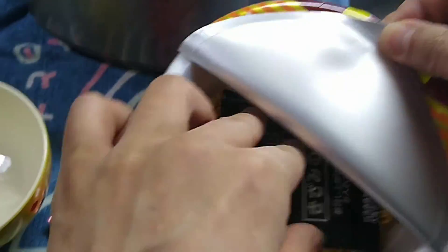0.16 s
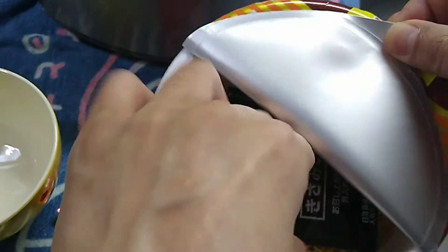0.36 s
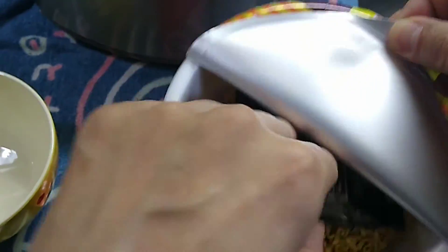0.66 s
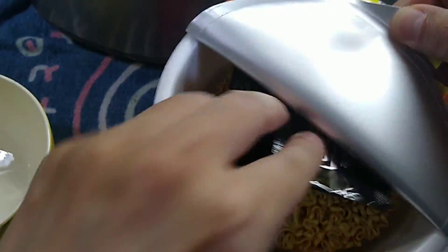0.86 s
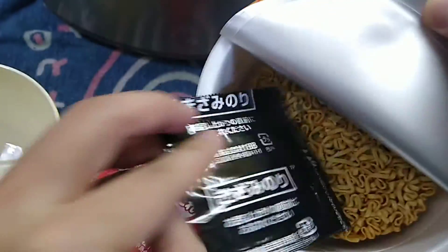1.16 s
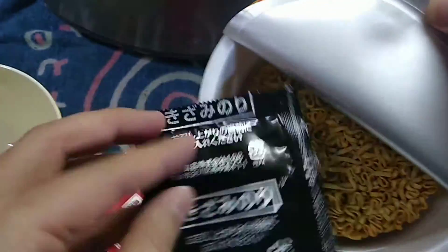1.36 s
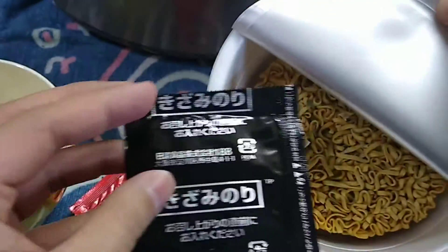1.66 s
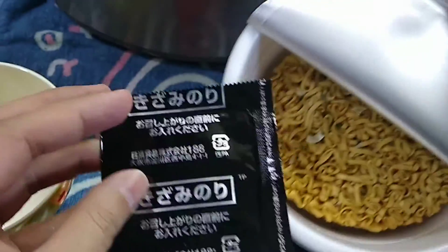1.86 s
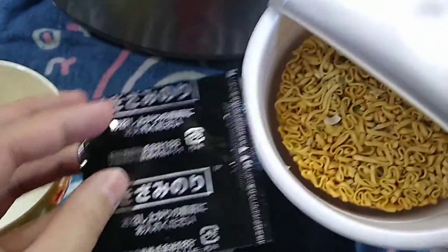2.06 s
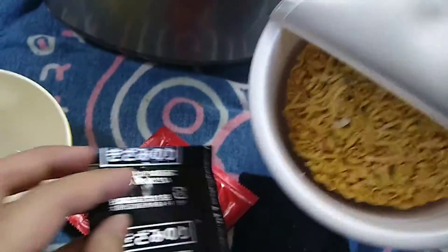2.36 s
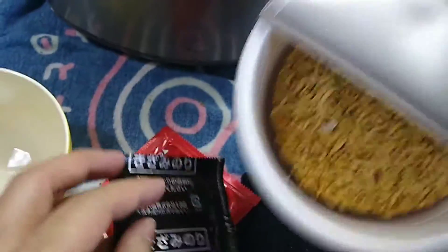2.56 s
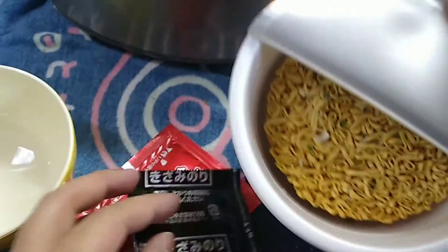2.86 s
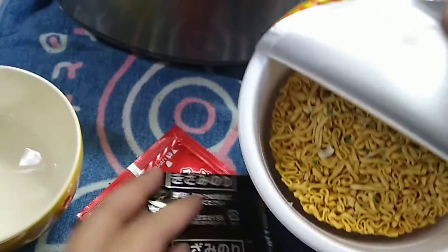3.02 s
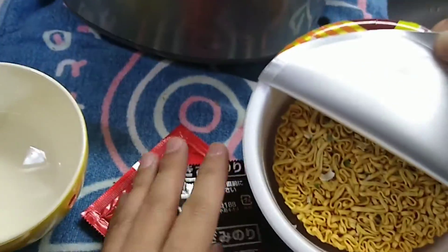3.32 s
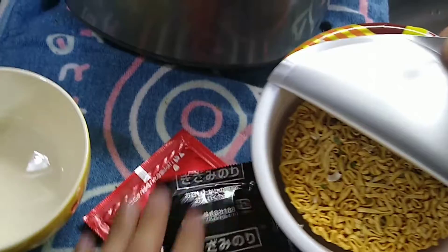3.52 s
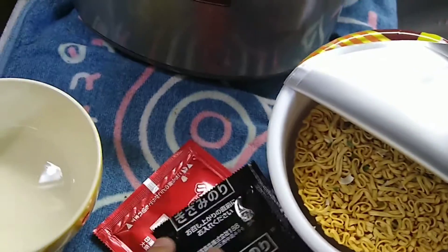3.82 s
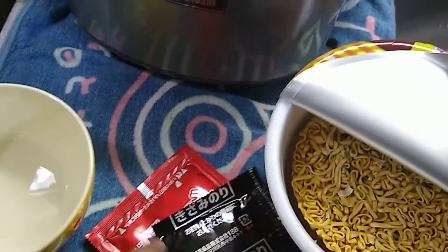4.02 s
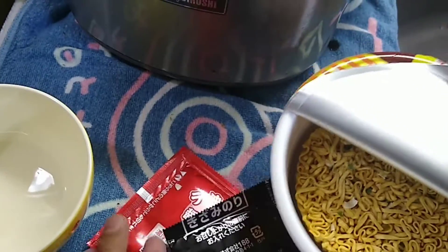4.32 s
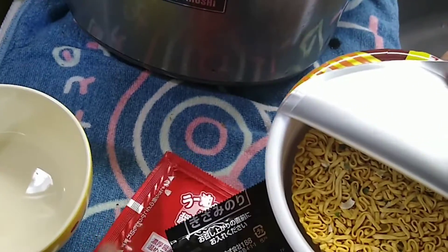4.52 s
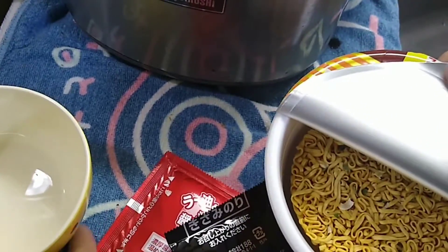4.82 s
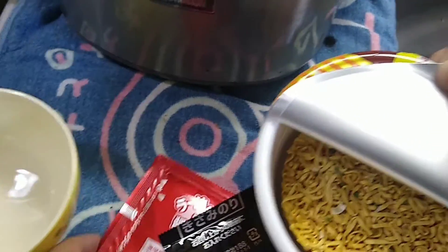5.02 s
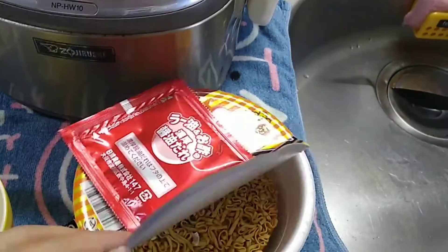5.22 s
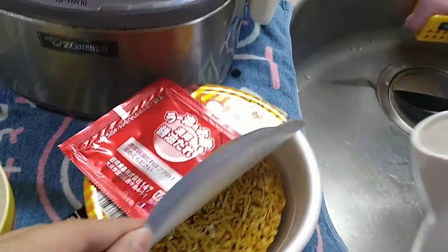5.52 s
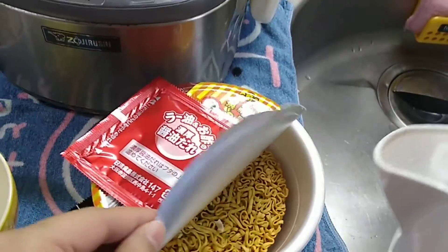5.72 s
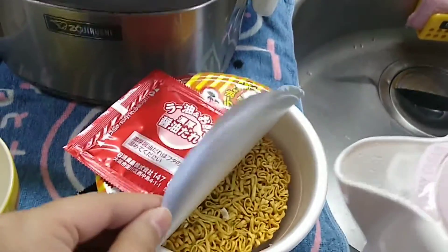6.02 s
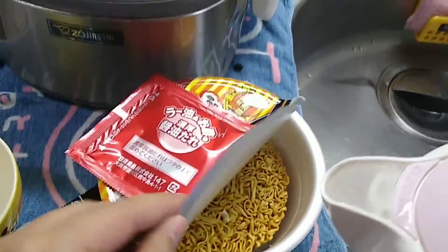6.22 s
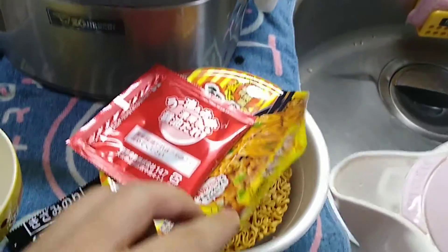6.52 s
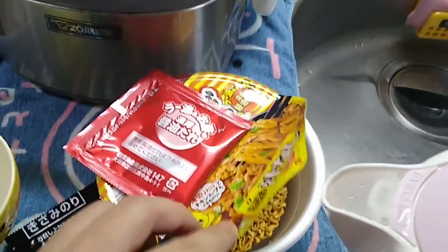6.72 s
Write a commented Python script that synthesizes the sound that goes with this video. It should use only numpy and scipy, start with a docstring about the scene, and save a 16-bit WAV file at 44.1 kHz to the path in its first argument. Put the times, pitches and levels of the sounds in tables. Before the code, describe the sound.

A foil sachet is handled very close to the microphone in a quiet kitchen. Light rustling starts at once and builds into dense, bright crinkling with sharp snaps, loudest from about 0.6 to 1.5 seconds as it leaves a foam noodle bowl. Soft hollow knocks on the bowl sound underneath, the clearest near 0.9 seconds. Around 1.8 to 2.2 seconds the film slides more quietly with a thin, faint scrape, followed by duller crackles and bumps until 2.8. After a brief lull with faint fingertip taps, separate crisp bursts come at about 3.4, 3.7, 4.0 and 4.3 seconds, with another hollow knock at 4.0. Softer rustling follows, turning into smooth, swishing strokes on the lid from about 5.4 to 6.3 seconds, with a light bump at 5.6. A last small crackle and taps come near 6.4, fading into faint room noise and low rumble.

```python
"""Foil sachet and noodle bowl

A quiet kitchen, a phone's two microphones close by. A hand lifts a foil sachet out of a foam noodle
bowl, lays it on a cloth and handles the lid. The film rustles in dense tiny cracks and snaps where a
crease buckles; bowl and sachet ring under it. Fingers knock, tap and scrape; the room rumbles behind."""
import sys
import numpy as np
from scipy import signal
from scipy.fft import rfft, irfft, next_fast_len
from scipy.io import wavfile
from scipy.ndimage import uniform_filter1d

SR = 44100
rng = np.random.default_rng(int(sys.argv[2]) if len(sys.argv) > 2 else 0)


def materialize(psi):
    """Save the field psi as 16-bit PCM at rate SR to the path in sys.argv[1].

    A 1-D psi becomes a single channel; in a 2-D psi each row is a channel.
    """
    bounded = np.clip(np.atleast_2d(psi).T, -1, 1)
    quanta = np.round(bounded * 32767).astype(np.int16)
    wavfile.write(sys.argv[1], SR, quanta)


N = 303408
T = np.arange(N) / SR
FFT_SIZE = next_fast_len(N + 4096)
HZ = np.maximum(np.fft.rfftfreq(FFT_SIZE, 1 / SR), 1)

# How much of the rustle is separate cracks, not smooth sliding: (time [s], share [0-1])
CRACK_SHARE = [(0, .35), (.5, .55), (1.6, .55), (1.85, .1), (2.15, .15), (2.3, .6), (4.35, .5), (4.5, .25),
               (5.3, .25), (5.45, .07), (6.28, .07), (6.33, .3)]
# The film's bright and dull voices at close range: (frequency [Hz], relative level [dB])
BRIGHT_FILM = [(2500, -43.5), (4800, -7), (6400, -3), (8000, -5), (10200, -2), (12500, -6), (14500, -9),
               (16000, -13)]
DULL_FILM = [(900, -43), (1900, -11), (2250, -4.5), (2800, 3), (3400, 3.5), (4200, 1.5), (5000, -9),
             (8000, -46)]
# Resonances of the foam bowl: (frequency [Hz], width [Hz], relative level [dB])
BOWL_MODES = [(710.4, 28, 8), (809, 120, 5), (937, 230, 8.5), (1384, 90, 2), (1560, 1500, 6.5),
              (565.3, 110, -13)]
# Creases buckling close to the microphones: (time [s], bright film level [dB],
# dull film offset [dB], bowl offset [dB], bright film t60 [s], crack pitch [Hz])
CREASE_SNAPS = [(0.131, -42.5, -1.5, -10, 0.043, 10100), (0.241, -44.5, -3, -6, 0.017, 7000),
                (0.2668, -32, -8, -3, 0.021, 6330), (0.3668, -40, -6, -10, 0.011, 9100),
                (0.394, -36, -25, -30, 0.013, 9600), (0.444, -33, -5.5, -22, 0.012, 8000),
                (0.515, -28, -10, -11.5, 0.021, 7470), (0.5671, -29.5, -21, -9, 0.041, 10650),
                (0.592, -16.5, -14, -17.5, 0.021, 10460), (0.619, -17.5, -18, -30, 0.0092, 10500),
                (0.6433, -32, 0, -25, 0.024, 7090), (0.663, -21, -9.5, -6.5, 0.025, 6630),
                (0.697, -22.5, -4, -9, 0.023, 10600), (0.729, -14, -26.5, -26, 0.0089, 12070),
                (0.852, -22.5, -19, -9, 0.011, 8600), (0.916, -22, -35, -19, 0.015, 12800),
                (0.9526, -19.5, -18, -17, 0.015, 11450), (1.034, -27, -23, -31, 0.024, 11400),
                (1.049, -20, -10, -23, 0.0094, 8000), (1.0615, -22.5, -7, -11.5, 0.022, 8950),
                (1.0968, -17, -28, -25, 0.034, 6630), (1.1309, -6, -21, -25.5, 0.015, 9370),
                (1.1496, -19.5, -24, -25, 0.019, 9900), (1.201, -28, -31, -13.5, 0.018, 10300),
                (1.2297, -28, -32, -22, 0.019, 7900), (1.277, -22.5, -33.5, -39, 0.02, 10900),
                (1.2977, -22, -32, -16.5, 0.026, 7970), (1.477, -21.5, -11, -13, 0.018, 6560),
                (1.515, -27, 0, -3.5, 0.0072, 4070), (1.531, -15, -6, -11.5, 0.024, 4610),
                (1.724, -43, -6.5, -8.5, 0.035, 8050), (2.227, -30, -2, -9.5, 0.072, 4650),
                (2.2415, -25, -11, -20, 0.036, 5940), (2.268, -28.5, -8, -18.5, 0.022, 5800),
                (2.4438, -42, -5, -4.5, 0.018, 5860), (2.4942, -31, -8, -25, 0.017, 8950),
                (2.561, -51.5, 1.5, 3, 0.02, 4460), (2.6036, -43, -3, -3.5, 0.022, 8500),
                (2.6454, -41, -19, -4, 0.02, 5900), (2.81, -38, -3, -1, 0.011, 5000),
                (2.823, -26, -6, -12, 0.022, 2620), (3.3579, -45, -3, -9.5, 0.027, 8140),
                (3.376, -39.5, -13, -46, 0.11, 10900), (3.3974, -17.5, -14, -20.5, 0.019, 8160),
                (3.4536, -24, -10, -16, 0.028, 9630), (3.687, -41.5, -7, -30, 0.039, 7600),
                (3.717, -26.5, -23, -18.5, 0.067, 8000), (3.907, -46.5, 1, -12, 0.017, 5060),
                (3.9413, -35.5, -33, -42, 0.0124, 5700), (4.0055, -23, -14.5, -18, 0.047, 10800),
                (4.1067, -41.5, -9, -14.5, 0.023, 9870), (4.118, -43.5, -13, -24, 0.024, 10500),
                (4.2678, -31.5, -27, -47, 0.054, 10170), (4.325, -24.5, -12, -18, 0.033, 5520),
                (4.705, -59.5, 13, 1, 0.022, 4500), (4.796, -39, -11, -39, 0.033, 5500),
                (4.939, -45.5, 5, -21.5, 0.018, 7750), (5.0492, -49, 4, -13, 0.016, 6675),
                (5.251, -34.5, -17, -13.5, 0.068, 8400), (5.626, -42.5, 5, 2, 0.025, 6000),
                (6.397, -35.5, -8, -17.5, 0.046, 6000)]


def sachet():
    """Foreground: rustle and snaps shake the bright film, dull film and bowl, each in its own measure."""
    share = np.interp(T, *np.transpose(CRACK_SHARE))
    bright, dull, bowl = hand_strokes(share) * undb(2 * 1.2 * flutter(45))
    dull, bowl = (rub * undb(2 * 2.0 * flutter(30)) for rub in (dull, bowl))
    when, snap_db, dull_db, bowl_db, t60, crack_hz = np.transpose(CREASE_SNAPS)
    rise_s = 0.12 * t60  # long crunches build more slowly
    common_cracks = tiny_cracks()
    # a snap opens on a pitched crack: harder when sudden or high, a ring when low, broad when high
    crack_db = snap_db + 7.5 - 900 * rise_s + 20 * np.log10(crack_hz / 6600)
    crack = rings(when + rise_s / 2, crack_db, t60 / 2, crack_hz,
                  rise_s=.0002, spread=2e-9 * crack_hz ** 2)
    out = microphones(0, 0.97, tone=crack)
    bodies = [(shifting_folds, colour(BRIGHT_FILM), bright, 0, 1.0),
              (shifting_folds, colour(DULL_FILM), dull, dull_db, 1.2),
              (microphones, modes(BOWL_MODES), bowl, bowl_db, 1.6)]
    for radiate, response, rub, offset_db, t60_factor in bodies:
        # most cracks are heard in every body, some in one only
        grain = 1 - share + share * (3 * common_cracks + tiny_cracks()) / 4
        snaps = blows(when, snap_db + offset_db, t60_factor * t60, rise_s)
        out = out + radiate(rub * grain + buckling(snaps), response)
    return out


def buckling(snaps):
    """Power around each snap: the film creaks under strain, gives, then sheet, table and walls answer."""
    creak_s = 0.0025
    strain = signal.lfilter([1], [1, -np.exp(-1 / (creak_s * SR))], snaps[::-1])[::-1]
    creak = undb(2 * -18.5) * strain * 300 / SR
    tail = undb(2 * -9.5) * fade(snaps, t60_s=0.042) * 600 / SR
    return creak + snaps + tail


# Single movements of the hand on the film, close up: (time of full strength [s], hold [s], swell [s],
# bright film level [dB], dull film offset [dB], bowl offset [dB])
HAND_STROKES = [(0.004, 0.01, 0.073, -53, -9, -14.5), (0.13, 0.0074, 0.17, -55, -3.5, -9),
                (0.265, 0.065, 0.41, -49.5, -6, -7.5), (0.365, 0.02, 0.011, -45.5, -8, -9.5),
                (0.455, 0.016, 0.084, -50, -11, -3), (0.523, .005, 0.034, -45.5, -7.5, -11.5),
                (0.608, .005, 0.016, -35, -4.5, -6.5), (0.66, 0.13, 0.037, -42, -7.5, -6.5),
                (0.826, 0.049, 0.096, -35, -9.5, -12), (0.899, 0.083, 0.12, -39.5, -7.5, -5),
                (1.06, 0.081, 0.088, -28.5, -15.5, -12), (1.2, 0.051, 0.28, -41, -21, -15.5),
                (1.296, 0.013, 0.12, -35, -12, -14.5), (1.35, 0.066, 0.15, -52, -4, -14.5),
                (1.528, 0.018, 0.097, -38.5, -7, -7.5), (1.64, 0.11, 0.16, -60.5, -5, -15.5),
                (1.904, 0.12, 0.29, -54, -5, -39), (2.06, 0.093, 0.15, -52, -5.5, -24),
                (2.244, 0.0055, 0.16, -43.5, -3.5, -9.5), (2.495, 0.037, 0.11, -49, -1.5, -6),
                (2.621, 0.064, 0.037, -50, -3, -5), (2.779, 0.049, 0.099, -48, -3, -0.5),
                (3.052, 0.0084, 0.027, -63, -14, -11), (3.178, 0.077, 0.064, -60, -15, -51),
                (3.279, 0.021, 0.026, -68, -9, -29.5), (3.395, 0.021, 0.0095, -39, -6.5, -27),
                (3.462, 0.0038, 0.092, -40.5, -7, -16.5), (3.72, 0.011, 0.065, -35, -10.5, -18.5),
                (3.935, 0.011, 0.19, -47.5, -5, -28), (4.02, 0.0025, 0.011, -38.5, -8, -15),
                (4.272, 0.023, 0.049, -39, -7, -15.5), (4.349, 0.023, 0.11, -50.5, -10, -10),
                (4.453, 0.051, 0.43, -46.5, -7.5, -23.5), (4.598, 0.064, 0.19, -51, -7.5, -23),
                (4.7, 0.16, 0.28, -56, -11, -25.5), (5.056, 0.055, 0.0088, -54, -6.5, -17.5),
                (5.14, 0.066, 0.16, -46, -8, -43), (5.24, 0.048, 0.12, -55, -4.5, -12),
                (5.319, 0.031, 0.029, -59, 0.5, -1.5), (5.389, 0.02, 0.048, -47.5, -10, -28),
                (5.47, 0.086, 0.2, -42.5, -11.5, -45), (5.618, 0.029, 0.11, -43.5, -3, -12),
                (5.708, 0.08, 0.51, -43, -11, -29), (5.855, 0.032, 0.18, -46.5, -8, -54),
                (5.979, 0.027, 0.1, -53, -9.5, -38.5), (6.159, 0.047, 0.12, -54.5, -10, -40.5),
                (6.343, 0.016, 0.061, -55, -1.5, -9), (6.429, 0.066, 0.012, -61.5, -4, -10),
                (6.5, 0.024, 0.09, -67.5, -2, -5)]


def hand_strokes(crack_share):
    """Power on bright film, dull film and bowl: a stroke swells, holds, lets go; the film settles."""
    slide_stop_db_s, crumple_stop_db_s, settle_db_s = 894.5, 399, 121.5
    sliding_below, swell_curve = .2, 2.45
    contact_db, contact_ends_s, contact_fade_db_s = -74, 6.26, 56.5
    power = np.zeros((3, N))
    power[0] = undb(2 * (contact_db - contact_fade_db_s * np.maximum(T - contact_ends_s, 0)))
    for when, hold_s, swell_s, db, dull_db, bowl_db in HAND_STROKES:
        span = slice(max(int((when - swell_s) * SR), 0), int((when + hold_s + .5) * SR))
        early_s = np.maximum(when - T[span], 0)
        late_s = np.maximum(T[span] - when - hold_s, 0)
        swell = np.clip(1 - early_s / swell_s, 0, 1) ** (2 * swell_curve)
        stop_db_s = np.where(crack_share[span] < sliding_below, slide_stop_db_s, crumple_stop_db_s)
        release = undb(-2 * stop_db_s * late_s)
        settling = crack_share[span] * undb(2 * (-11.5 - settle_db_s * late_s))
        body_db = db + np.array([[0], [dull_db], [bowl_db]])
        power[:, span] += undb(2 * body_db) * swell * (release + settling)
    return power


def tiny_cracks(per_s=300, spread_db=4.5, loudest_db=11):
    """Power of many small cracks in the film, very uneven in size, mean 1."""
    hits = rng.random(N) < per_s / SR
    size_db = np.minimum(spread_db * rng.exponential(size=N), loudest_db)
    power = fade(hits * undb(2 * size_db), t60_s=.008)
    return power / power.mean()


def shifting_folds(power, response, shapes=9, shifts_per_s=14, shift_db=8, ripple_db=4.5, width_hz=220):
    """The crumpled sheet keeps changing shape: its sound drifts among sets of random resonances."""
    weights = undb(2 * shift_db * np.array([flutter(shifts_per_s) for _ in range(shapes)]))
    width_bins = int(width_hz * FFT_SIZE / SR)
    out = 0
    for weight in weights / weights.sum(axis=0):
        ripple = smooth(rng.standard_normal(len(HZ)), width_bins)
        resonances = unit_rms(undb(ripple_db * ripple / ripple.std()))
        out = out + microphones(power * weight, response * resonances)
    return out


# Resonances of the table under the bowl: (frequency [Hz], width [Hz], relative level [dB])
TABLE_MODES = [(201.8, 230, -1), (445, 750, -7)]
# Fingers and sachet bumping the bowl, close up: (time [s], level [dB], pitch [Hz], t60 [s])
BOWL_KNOCKS = [(0.09, -40, 268, 0.13), (0.36, -47.5, 300, 0.11), (0.696, -39.5, 313, 0.19),
               (0.847, -40.5, 240, 0.15), (0.923, -30.5, 320, 0.091), (1.106, -44, 322, 0.32),
               (1.484, -48, 290, 0.35), (1.733, -48, 298, 0.18), (1.959, -65, 303, 0.28),
               (2.147, -55, 282, 0.3), (2.175, -50, 298, 0.58), (2.234, -40, 292, 0.15),
               (2.486, -45, 252, 0.23), (2.671, -45.5, 240, 0.12), (2.74, -50.5, 270, .14),
               (2.816, -38.5, 230, 0.091), (4.002, -31.5, 302, 0.17), (4.928, -55, 230, 0.19),
               (5.628, -50, 283, 0.18)]


def knocks():
    """Soft bumps ring the air in the bowl, jolt its wall and thud in the table."""
    when, db, hz, t60 = np.transpose(BOWL_KNOCKS)
    air = microphones(0, 0.8, tone=rings(when, db, t60, hz, rise_s=0.0078, spread=.09))
    wall = microphones(blows(when, db - 14.5, t60 / 2, rise_s=.004), modes(BOWL_MODES))
    thud = microphones(blows(when, db - 14, t60, rise_s=0.0043), modes(TABLE_MODES))
    return air + wall + thud


# Fingertips on the bowl, faint even this close: (time [s], level [dB], pitch [Hz])
FINGER_TAPS = [(1.738, -49, 908), (3.014, -63.5, 980), (3.046, -58.5, 803), (3.238, -60.5, 813),
               (3.362, -52.5, 805), (4.454, -56.5, 810), (4.593, -54, 1370), (4.908, -60.5, 988),
               (5.049, -56, 781), (5.203, -56, 860), (5.587, -51, 887), (6.344, -53, 1390),
               (6.372, -55, 747), (6.448, -61, 710)]


def taps(t60_s=0.091, rise_s=.0025):
    """Fingertips ring small hollow notes above the knocks and jolt the bowl's wall."""
    when, db, hz = np.transpose(FINGER_TAPS)
    notes = microphones(0, 0.98, tone=rings(when, db, t60_s, hz, rise_s, spread=.035))
    wall = microphones(blows(when, db - 9.5, t60_s / 2, rise_s), modes(BOWL_MODES))
    return notes + wall


# Resonances the scrape sings in: (frequency [Hz], width [Hz], relative level [dB])
SCRAPE_MODES = [(2200, 75, 0), (2590, 35, -6), (3870, 50, -8), (1480, 60, -10)]
# One thin scrape near the phone: (time [s], level [dB])
SCRAPE_LEVEL = [(1.778, -70), (1.998, -59.5), (2.128, -60), (2.202, -54)]


def scrape():
    """Friction with an uneven grip sings through a few narrow resonances."""
    level_db = np.interp(T, *np.transpose(SCRAPE_LEVEL), left=-120, right=-120) + 3.3 * flutter(25)
    return microphones(undb(2 * level_db), modes(SCRAPE_MODES))


# Room tone of the kitchen, behind the hands: (frequency [Hz], relative level [dB])
ROOM_TONE = [(15, -30), (25, 0.5), (129, -3.5), (183, -23.5), (360, -19.5), (421, -32), (2500, -23.5),
             (7000, -23), (15500, -25)]
# Handling that reaches the phone through the table: (time [s], level [dB])
TABLE_RUMBLE = [(0.0, -70.5), (0.84, -85), (0.92, -58), (1.2, -81), (4.54, -78), (4.73, -89), (5.12, -75),
                (5.48, -82.5), (6.88, -90.5)]


def kitchen(room_db=-82.5):
    """Background: faint steady room noise and a wavering low rumble in the table."""
    room = microphones(undb(2 * room_db), colour(ROOM_TONE))
    rumble_db = np.interp(T, *np.transpose(TABLE_RUMBLE)) + flutter(6)
    rumble = microphones(undb(2 * rumble_db), modes([(83.4, 17, 0.5), (119.4, 11, -5.0)]))
    return room + rumble


# The phone's microphone pair, close to the bowl:
# (frequency [Hz], left minus right [dB], left phase lead [rad], likeness [0-1])
MICROPHONE_PAIR = [(60, 2.3, 0, .75), (300, 1.5, 0, .92), (700, -.4, 0, .92), (1400, -1, .6, .7),
                   (2300, -2.5, .8, .55), (3300, 0, np.pi, .9), (4300, 3.5, 6.5, .5), (8000, 5.6, 13.4, .4),
                   (15000, 6.5, 20, .25)]


def microphones(power, response, tone=0):
    """Noise with this power envelope, plus any tone, through a body to the left and right microphones."""
    excitation = np.sqrt(power) * rng.standard_normal((2, N)) + tone
    direct, other = response * rfft(excitation, FFT_SIZE)
    hz, balance_db, lead_rad, likeness = np.transpose(MICROPHONE_PAIR)
    alike = over_log_hz(hz, likeness)
    lead = np.interp(HZ, hz, lead_rad)
    side_gain = undb(over_log_hz(hz, balance_db) / 2)
    right = alike * direct * np.exp(-1j * lead) + np.sqrt(1 - alike ** 2) * other
    return irfft(np.array([direct * side_gain, right / side_gain]), FFT_SIZE)[:, :N]


def blows(times, levels_db, t60_s, rise_s):
    """Power of single blows: each rises quickly and dies away."""
    power = np.zeros(N + SR)
    t = np.arange(SR // 2) / SR
    for when, db, t60, rise in np.broadcast(times, levels_db, t60_s, rise_s):
        start = int(when * SR)
        power[start:start + len(t)] += undb(2 * db) * np.minimum(t / rise, 1) * 1000. ** (-2 * t / t60)
    return power[:N]


def rings(times, levels_db, t60_s, pitches_hz, rise_s, spread):
    """Each blow rings eight partials a channel, scattered around its pitch by the fraction `spread`."""
    out = np.zeros((2, N + SR))
    for when, db, t60, hz, rise, width in np.broadcast(times, levels_db, t60_s, pitches_hz, rise_s, spread):
        start, count = int(when * SR), min(int(t60 * SR), SR // 4)
        t = np.arange(count) / SR
        detune, phase = rng.random((2, 2, 8, 1))
        partials_hz = hz * (1 + width * (2 * detune - 1))
        cluster = np.sin(2 * np.pi * partials_hz * t + np.pi * phase).sum(axis=1)
        cluster /= np.abs(cluster[:, :count // 4]).max()
        out[:, start:start + count] += undb(db) * cluster * np.minimum(t / rise, 1) * 1000. ** (-t / t60)
    return out[:, :N]


def modes(table):
    """Response of resonances (frequency [Hz], width [Hz], relative level [dB]), unit gain on noise."""
    return unit_rms(sum(undb(db) * 1j * HZ * width / (hz ** 2 - HZ ** 2 + 1j * HZ * width)
                        for hz, width, db in table))


def colour(table):
    """Smooth response through (frequency [Hz], relative level [dB]), unit gain on noise."""
    return unit_rms(undb(over_log_hz(*np.transpose(table))))


def flutter(per_s):
    """Smooth random wavering around zero, spread near 1."""
    step = int(SR / per_s)
    levels = np.repeat(rng.standard_normal(N // step + 1), step)
    return 0.98 * smooth(levels, step)[:N]


def fade(power, t60_s):
    """Every impulse of power dies away by 60 dB in t60_s."""
    return signal.lfilter([1], [1, -1000. ** (-2 / (t60_s * SR))], power)


def smooth(x, width):
    """Two passes of a moving average."""
    return uniform_filter1d(uniform_filter1d(x, width), width)


def over_log_hz(hz, values):
    """Values spread over the spectrum on a log frequency axis."""
    return np.interp(np.log(HZ), np.log(hz), values)


def unit_rms(gain):
    """A response scaled to leave the power of white noise unchanged."""
    return gain / np.sqrt(np.mean(np.abs(gain) ** 2))


def undb(db):
    """Amplitude of a level in dB; undb(2 * db) is its power."""
    return 10 ** (np.asarray(db) / 20)


def scene():
    """Everything that reaches the phone, from the close sachet to the room behind."""
    return sachet() + knocks() + taps() + scrape() + kitchen()


def record(dry):
    """The phone rounds the loudest peaks and cuts the top."""
    top_hz = 15700
    lowpass = signal.ellip(10, .2, 70, top_hz, fs=SR, output="sos")
    return signal.sosfilt(lowpass, np.tanh(dry))


dry = scene()
out = record(dry)
materialize(out)
```